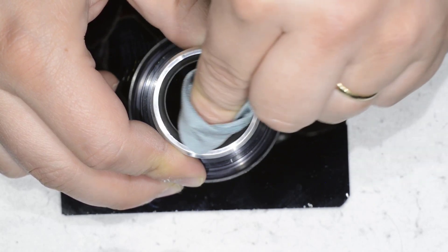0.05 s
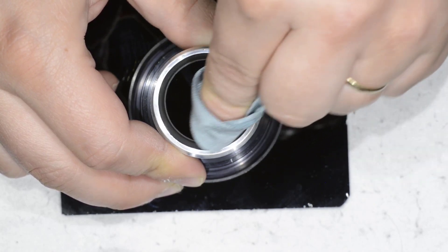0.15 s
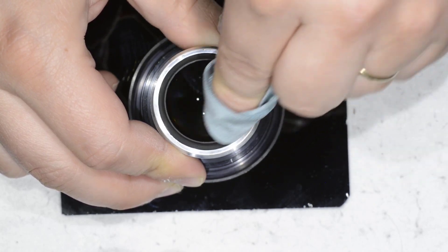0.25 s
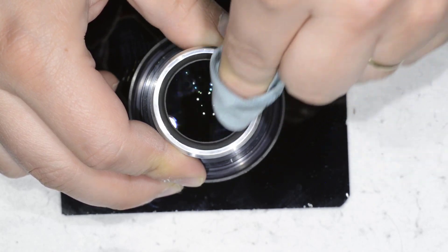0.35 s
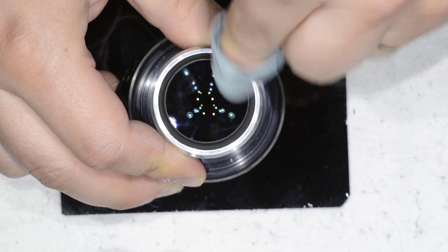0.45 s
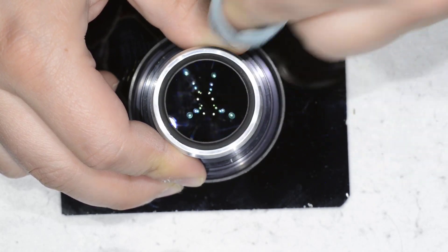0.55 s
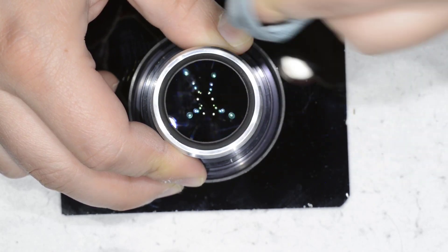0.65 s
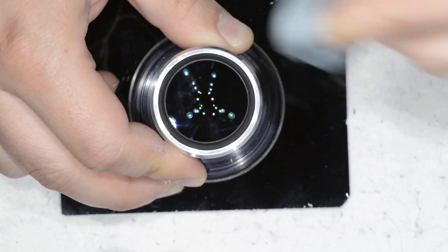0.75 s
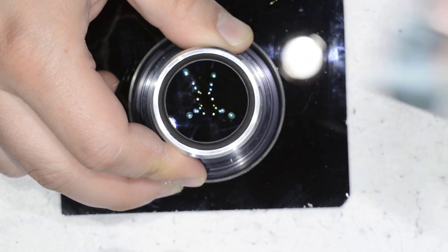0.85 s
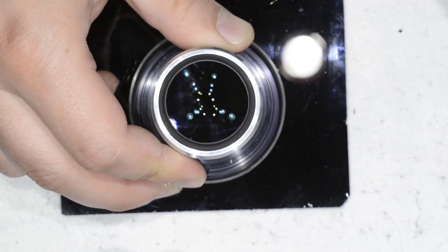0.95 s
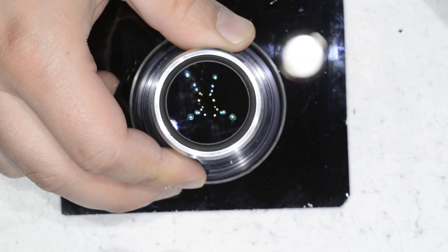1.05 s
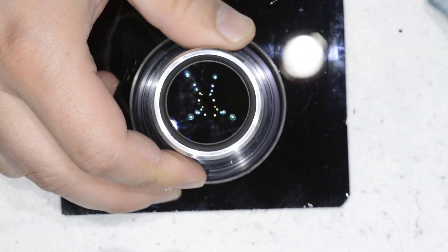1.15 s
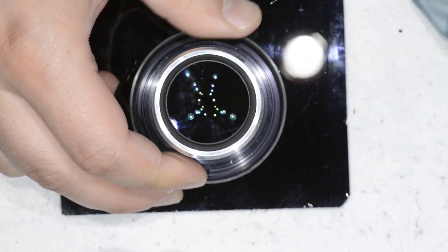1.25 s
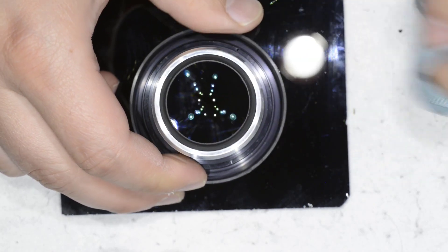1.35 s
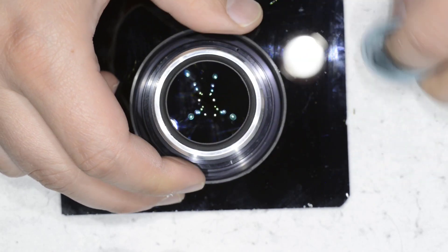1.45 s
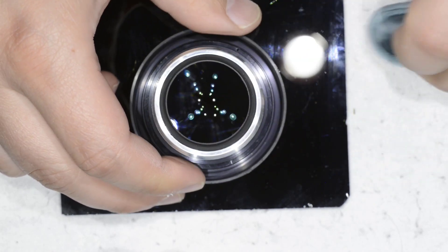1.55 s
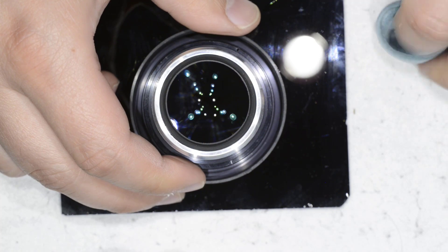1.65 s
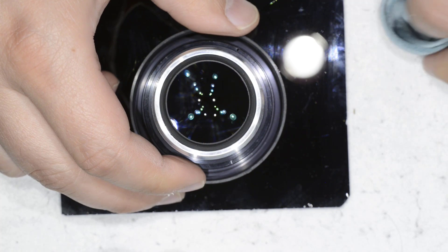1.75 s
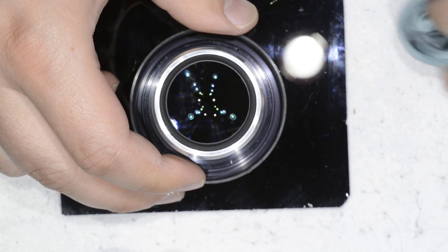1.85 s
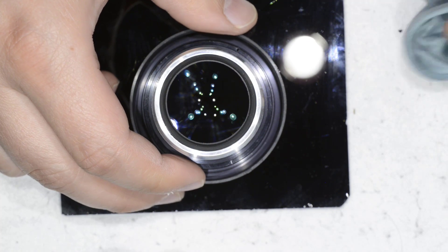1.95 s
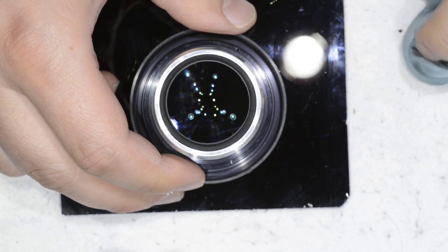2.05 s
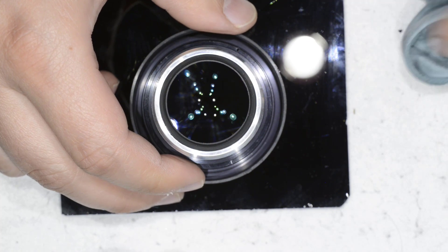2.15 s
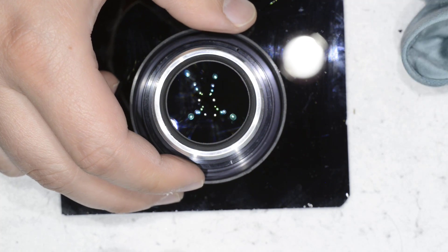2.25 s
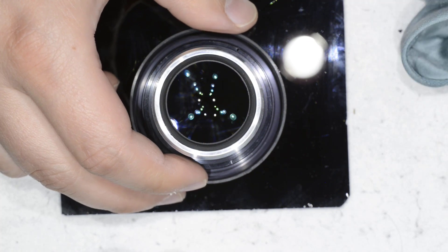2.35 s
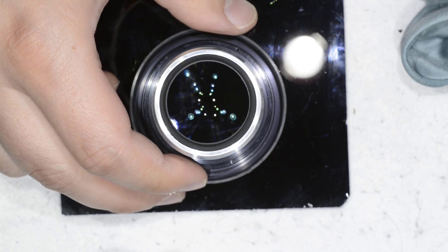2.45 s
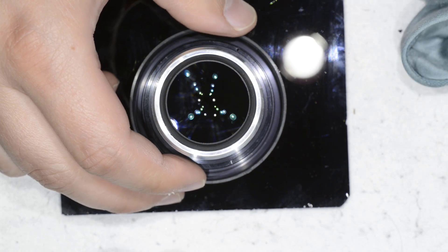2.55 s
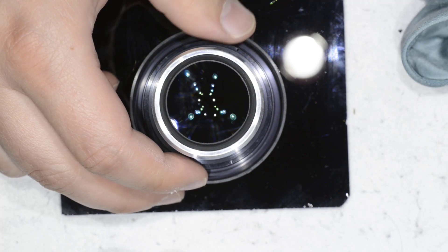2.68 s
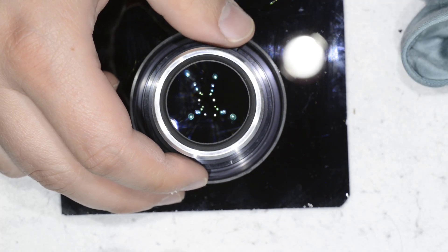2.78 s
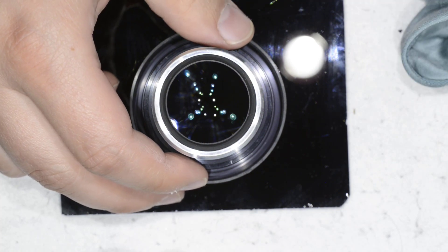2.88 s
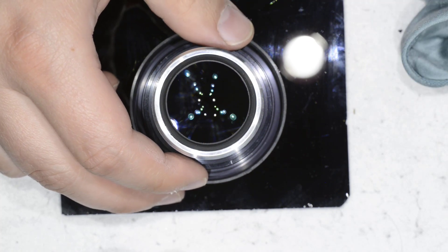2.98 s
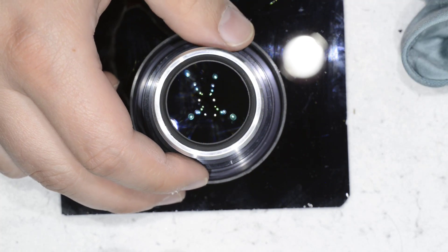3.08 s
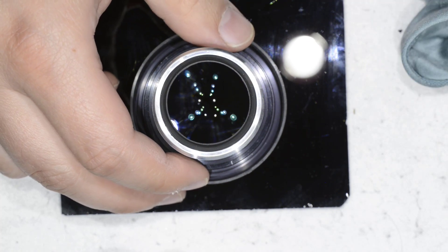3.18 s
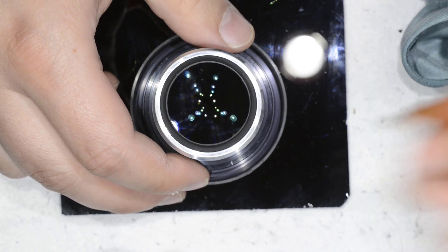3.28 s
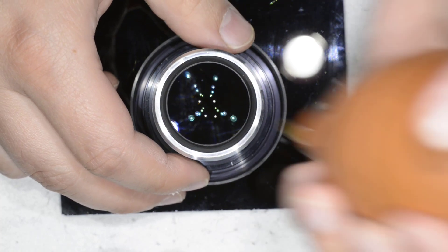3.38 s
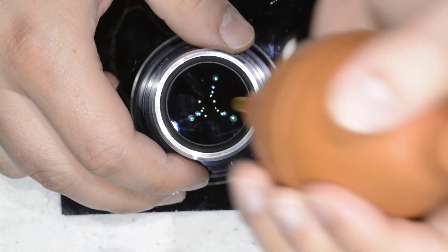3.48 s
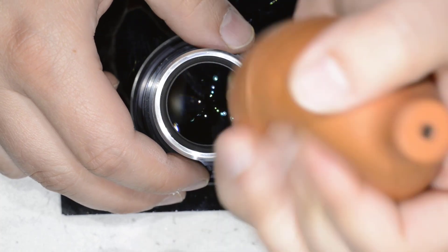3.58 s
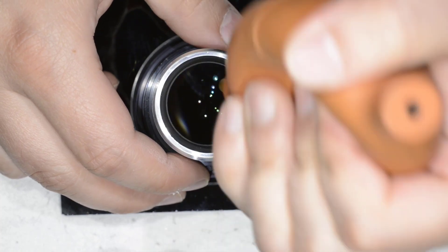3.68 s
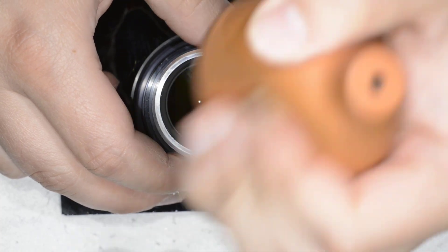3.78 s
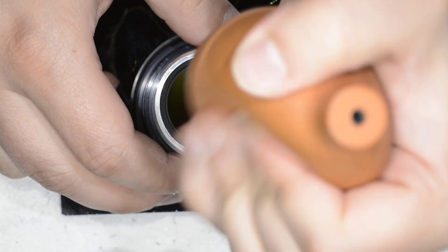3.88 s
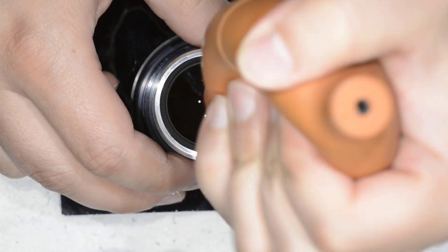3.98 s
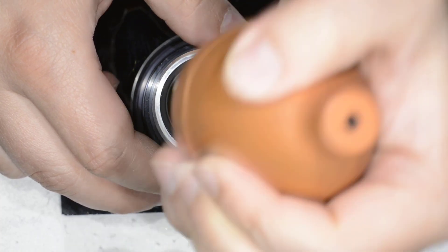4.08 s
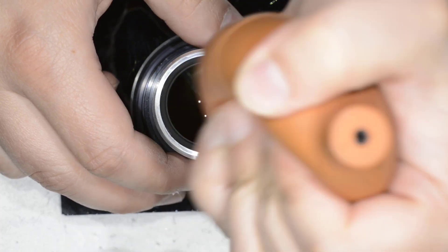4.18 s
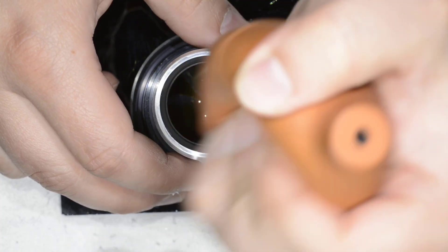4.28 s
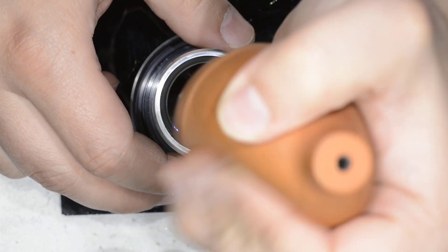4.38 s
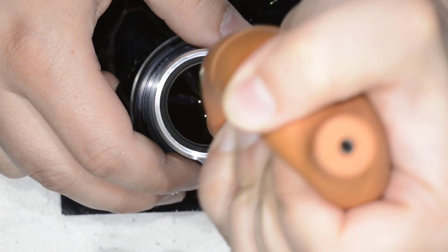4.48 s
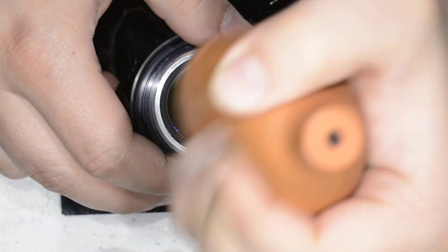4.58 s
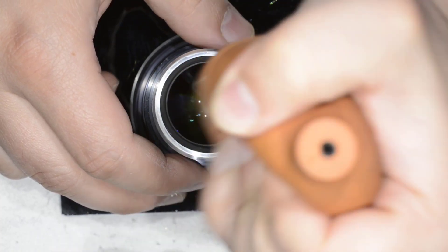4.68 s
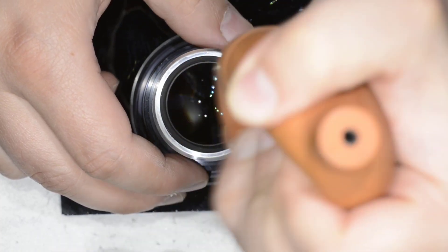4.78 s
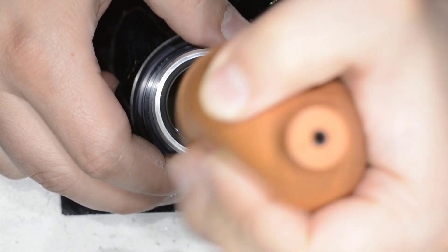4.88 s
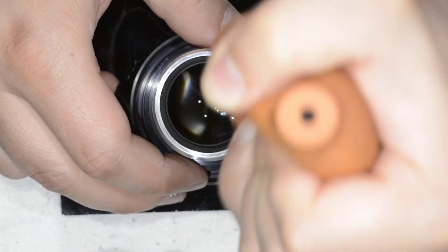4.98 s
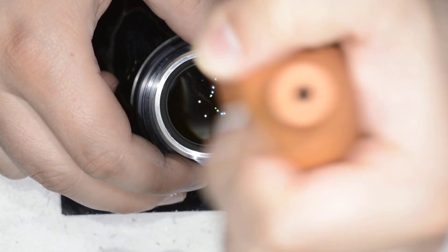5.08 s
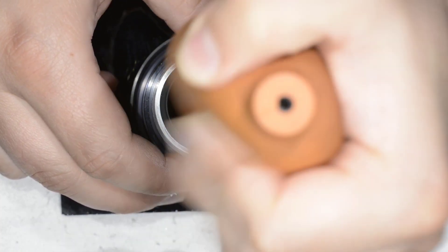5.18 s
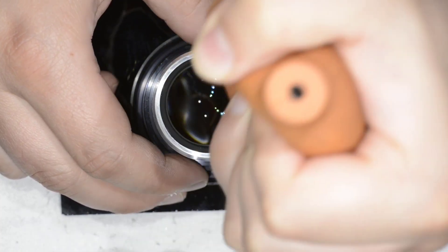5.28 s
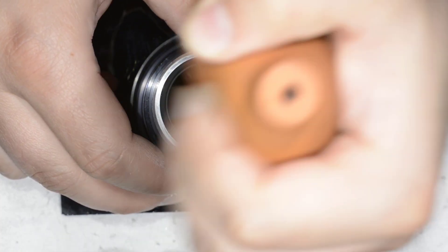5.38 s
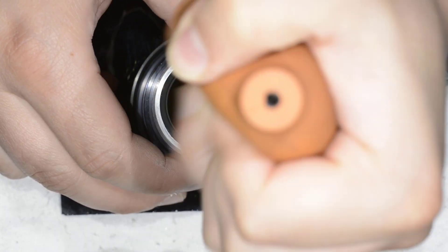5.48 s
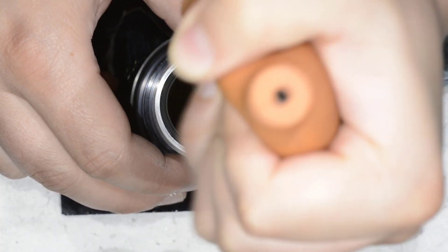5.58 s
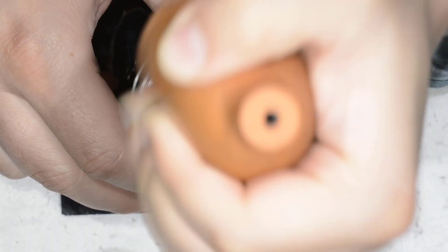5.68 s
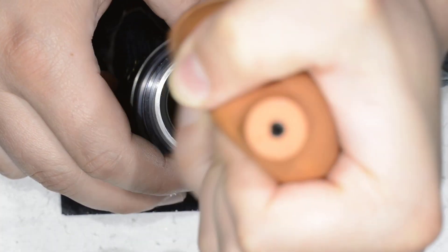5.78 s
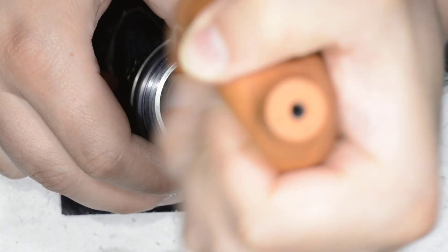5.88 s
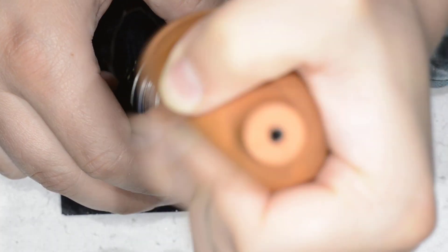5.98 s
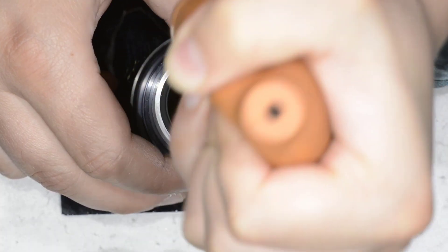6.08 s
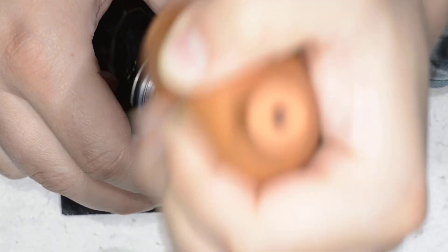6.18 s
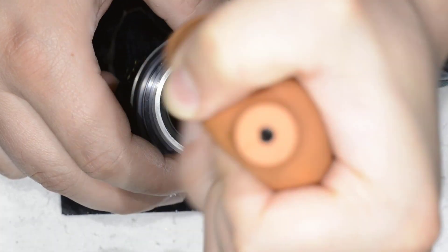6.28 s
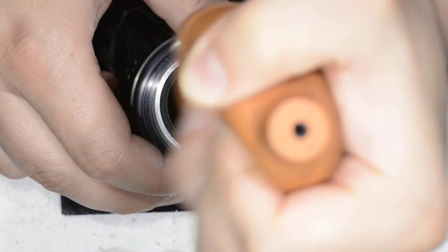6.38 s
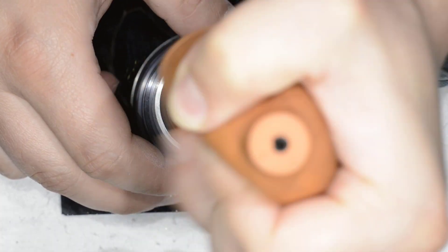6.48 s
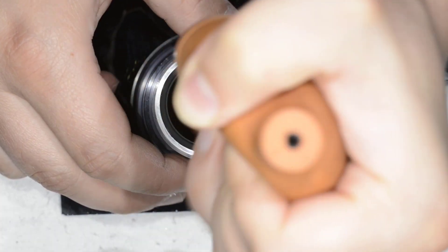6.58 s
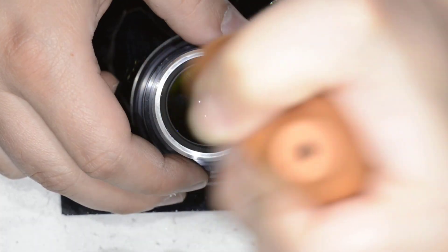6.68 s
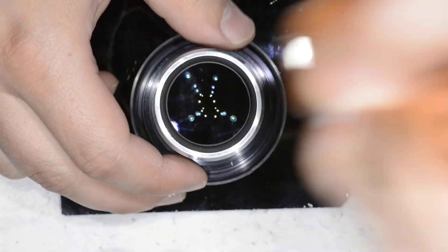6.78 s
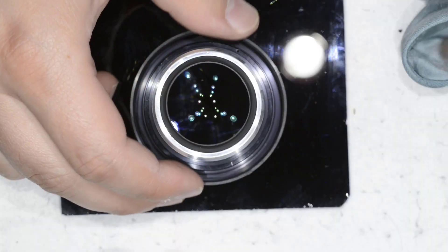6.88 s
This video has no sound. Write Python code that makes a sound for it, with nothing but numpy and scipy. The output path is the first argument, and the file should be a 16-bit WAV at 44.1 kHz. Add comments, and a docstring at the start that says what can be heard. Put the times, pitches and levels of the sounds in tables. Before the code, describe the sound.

Over faint hum and hiss, a few light clicks and rustles, then about thirteen fast airy puffs from a squeezed rubber bulb, each wheezing back in with a snap.

```python
"""A rubber bulb blower, close to a stereo camera microphone, is squeezed about four times a second over a lens.
Each squeeze blows a noisy jet into the lens well; on release, air is sucked back in as a higher hiss.
From the second squeeze on, the inlet valve snaps shut: a pulse through the bulb's resonances.
Before that come ticks of the lifted nozzle and rustles of the hand: short scrapes, knocks and noise.
Behind it lie a small room's decaying noise tail, steady electrical hum and microphone hiss."""
import sys
import numpy as np
from scipy import signal
from scipy.fft import rfft, irfft, next_fast_len
from scipy.io import wavfile
from scipy.ndimage import uniform_filter1d

SR = 44100
rng = np.random.default_rng(int(sys.argv[2]) if len(sys.argv) > 2 else 0)


def unload_audio(sound):
    """Save the sound as a 16-bit wav file, at the path given as the first command line argument."""
    columns = np.transpose(np.atleast_2d(sound))
    # keep every value between -1 and 1, then stretch to whole-number steps
    steps = np.round(np.clip(columns, -1, 1) * 32767)
    wavfile.write(sys.argv[1], SR, steps.astype(np.int16))


def gain_from_db(level_db):
    """Convert decibel levels to linear amplitude factors (20 dB per decade)."""
    decades = np.asarray(level_db, float) / 20
    return 10 ** decades


N = 306362  # length in samples

# Electrical hum near harmonics of the frame rate, then of the mains.
# Each row: frequency in Hz, left and right rms level in dB before the floor gain.
FRAME_HUM_LINES = [(29.97, -55.5, -65), (59.5, -67, -65.5), (91, -64.5, -64), (179, -75.5, -71.5)]
MAINS_HUM_LINES = [(250, -73, -72.5), (305, -75.5, -70.5), (349, -75, -75), (451, -76.5, -75.5),
                   (560, -80, -78.5), (636, -78, -74.5)]
# Colour of the microphone hiss. Each row: frequency in Hz, relative density in dB.
HISS_COLOUR = [(15, -27), (30, -14), (50, -18), (80, -8), (200, -10.5), (450, -13.5), (1000, -16.5),
               (3000, -21), (8000, -24.5), (15900, -26.5)]
# How the two microphone ports hear the hiss, the blower's nozzle and its inlet at the rear.
# Each row: frequency in Hz, likeness of the sides from 0 to 1, lead of the left in radians, left over right in dB.
HISS_EARS_ROWS = [(60, 0.66, 0.19, 15), (200, 0.64, -0.26, -1), (700, 0.52, -.2, -4),
                  (2000, 0.48, 0.24, -2.5), (5000, 0.44, 0.3, 0), (12000, 0.44, 0.24, 2.5)]
NOZZLE_EARS_ROWS = [(700, 1, 0, 0), (2000, 0.97, 0.064, 0.7), (3520, 1, 0.52, 1), (4740, 0.8, 0.6, 3.5),
                    (6170, 0.95, 0.6, 3), (7600, 0.8, 0.93, 2.7), (8900, 0.7, 1.74, 0.5),
                    (11100, 0.55, 1.3, 4.5), (13000, .8, 1.7, 3), (15000, 0.7, 1, 1)]
INLET_EARS_ROWS = [(700, 1, 0.36, .5), (3550, 0.99, 0.35, 1.4), (4850, 0.5, 0.83, 6), (6300, 1, 1.52, 2.5),
                   (7600, 0.52, 1.9, 4.6), (9100, 0.58, 4, 1.5), (10400, 0.65, 2.14, 3.3),
                   (11800, .2, 1.5, 4), (13000, .5, 2, 1.8), (15000, 0.59, 3, 1.8)]
# Hum and hiss sink under the loudest puffs: gain in dB, onset in dB, dB lost per dB above it, memory in seconds.
FLOOR_DB, SINK_FROM_DB, SINK_SLOPE, SINK_MEMORY_S = 6, -21, 2.3, 0.2

# Decay of the room. Each row: frequency in Hz, time to fall 60 dB in seconds.
ROOM_DECAY = [(300, 0.21), (3000, 0.21), (12000, 0.12)]

# Ticks of the plastic nozzle as the blower is lifted.
# Each row: start in seconds, level in dB, dull knock and ring in dB relative to that level.
NOZZLE_TICKS = [(1.202, -46, -6, -12), (2.435, -56, 16, -12), (2.4555, -43, 1, -10),
                (2.4724, -32.5, -14, -2), (2.4914, -46, 1, -2), (2.64, -43, -1, -8), (2.846, -46, 0, -12),
                (2.8706, -38, -4, -13), (2.8964, -37.5, -3, 3.5)]
# Modes of the nozzle. Each row: frequency in Hz, level in dB, time to fall 60 dB in seconds.
NOZZLE_MODES = [(2590, 0.5, 0.039), (2540, -7, 0.068), (3450, -6, 0.02), (4400, -9, 0.06),
                (6420, 2.5, 0.039), (6500, -9, 0.084), (8700, -11, .04)]
# Rustles and clicks of the hand on the rubber.
# Each row: start and end in seconds, top level in dB, rise in seconds, sag by the end in dB.
GRIP_STROKES = [(1.9191, 1.93, -39, .0004, 40), (3.29, 3.385, -54, 0.046, 5),
                (3.446, 3.505, -43.5, 0.015, 7), (3.6058, 3.625, -37.5, 0.00067, 35)]
# Colour of the hand on the rubber. Each row: frequency in Hz, relative density in dB.
RUSTLE_COLOUR = [(1500, -30), (3000, -6), (4000, 0), (6500, -2), (9000, -6), (15000, -16)]

# Inlet valve snapping shut. Each row: time in seconds, drive in dB before the pulse gains and resonances.
VALVE_SNAPS = [(3.911, -19), (4.1752, -14.5), (4.4358, -10.5), (4.694, -7), (4.9515, -5.5), (5.2392, -5.5),
               (5.5084, -5.5), (5.7779, -10), (6.035, -5), (6.2892, -5.5), (6.5264, -5.5), (6.719, -8)]
# Resonances of bulb and valve seat. Each row: frequency in Hz, width in Hz, left and right gain in dB.
BULB_MODES = [(247, 250, 17.5, 9.5), (890, 390, 13.5, 11.5), (2350, 1700, 8.5, -3), (6030, 5400, -2, -25)]
# Bounces of the snap off desk and lens. Each row: delay in seconds, gain in dB before the treble loss.
DESK_BOUNCES = [(.00102, -13.5), (.0022, -15), (.0047, -11.5)]
OPEN_DB = -12.5  # drive of the valve dropping open, before its softening and the resonances

# Refill after each squeeze, until the next snap.
# Each row: top level of the inlet whistle in dB, rise in seconds, sag by the end in dB.
REFILL_STROKES = [(-27, 0.097, 15), (-25.5, 0.074, 8), (-26, 0.083, 6.5), (-27, 0.073, 1),
                  (-27.5, 0.056, 0), (-28, 0.092, 0), (-27.5, 0.082, 0), (-26.5, 0.084, 2), (-26, 0.085, 9),
                  (-27.5, 0.053, 0), (-25.5, 0.069, 6), (-27.5, 0.042, 7), (-28, 0.06, -0.5)]
# Colours of the inlet whistle and of the body of the refill. Each row: frequency in Hz, relative density in dB.
WHISTLE_COLOUR = [(4710, -31), (8000, -6.5), (8570, -11), (9130, 2.5), (9690, -0.5), (10500, 1.5),
                  (11400, -7.5), (12400, -7), (13200, -15), (14600, -11), (15100, -5), (15900, -55)]
BODY_COLOUR = [(290, -54), (500, -27), (654, -30), (1030, -13.5), (1150, -21.5), (1480, -15.5),
               (1710, -18.5), (2340, -11.5), (2570, -13.5), (2930, -9.5), (3790, -11.5), (4800, -5.5),
               (5300, 0), (5900, -0.5), (7290, -3), (8200, -4.5), (10700, -29), (18000, -120)]
BODY_DB, BODY_FOLLOWS = 0.82, 0.65  # body relative to whistle at full flow; exponent on the flow
INLET_FALL_S, INLET_EDGE = 0.019, 1.04  # fall in seconds; steepness of the edges
INLET_EARLY_S, INLET_LATE_S = 0.0093, 0.0045  # overlap with the squeeze before and the snap after

# The squeezes. Each row: start and end in seconds, top level of the jet in dB, rise in seconds, sag by the end in dB.
SQUEEZE_STROKES = [(3.629, 3.791, -21, 0.074, -0.5), (3.915, 4.075, -19.5, 0.07, 3),
                   (4.174, 4.335, -19, 0.071, 6.5), (4.435, 4.597, -23, 0.046, 2.5),
                   (4.693, 4.8468, -17, 0.051, 3), (4.954, 5.124, -17, 0.039, 2),
                   (5.24, 5.3935, -17.5, 0.057, 4), (5.506, 5.6647, -16.5, 0.048, 8.5),
                   (5.774, 5.93, -18, 0.045, 5.5), (6.031, 6.19, -20.5, 0.034, 0.5),
                   (6.285, 6.435, -23, 0.028, 2.5), (6.516, 6.664, -23, 0.062, 6),
                   (6.72, 6.837, -16, 0.093, 9)]
# How each squeeze is aimed, before the flow corrections.
# Each row: lens well tone, splash on the glass, nozzle overtone and shear hiss, all in dB relative to the jet.
SQUEEZE_AIM = [(-9.5, -4.5, -9, -9.5), (-12.5, -5.5, -5.5, -6), (-10.5, -3.5, -5, -5), (-6, -4.5, -7, -1.5),
               (-13.5, -6.5, -5.5, -4.5), (-30, -6.5, -5, -5.5), (-20, -6, -3, -2), (-15.5, -7.5, -2.5, -5),
               (-9.5, -8, -3.5, -5.5), (-8.5, -7, -2, -5), (-4.5, -4, -6, -5.5), (-6, -3.5, -5.5, -4.5),
               (-14.5, -1.5, -6, -9.5)]
# Colours of the jet, lens well tone, low rush, splash, overtone and shear hiss.
# Each row: frequency in Hz, relative density in dB.
JET_COLOUR = [(2500, -38), (4000, -9), (4400, -8), (4850, -7), (5250, 0), (5650, -1.5), (6030, 1.5),
              (6400, -3), (6900, -10.5), (9000, -29)]
WELL_COLOUR = [(800, -24.5), (1100, -11), (1250, -6), (1400, 3.5), (1560, -5), (1900, -6.5), (2400, -26.5),
               (2750, -6.5), (2980, -1), (3250, -12.5), (4200, -30)]
BOOM_COLOUR = [(250, -34), (500, -12.5), (800, -3.5), (1050, -0.5), (1500, -3.5), (2200, -18), (3500, -45)]
SPLASH_COLOUR = [(900, -44), (1500, -25), (1760, -4), (1960, -5.5), (2250, -1.5), (2600, -2), (3000, -3),
                 (3500, -1), (4000, -5), (5200, -24)]
OVERTONE_COLOUR = [(5500, -49), (6800, -7.5), (7250, 0.5), (7500, -3), (7900, 1), (8300, -4.5), (8700, -5),
                   (10500, -25)]
SHEAR_COLOUR = [(5120, -33), (8700, -5), (9640, -3), (10600, 0), (12800, -3), (14100, -2.5), (14900, -7),
                (15900, -11)]
JET_FALL_S, JET_EDGE = 0.073, 1.41  # the hand runs out of travel; steepness of the edges
WELL_FOLLOWS = 0.53  # exponent on the stroke: the well tone grows more slowly than the jet
BOOM_DB = -20  # low rush relative to the jet at the top of a stroke

TOP_HZ = 15680  # upper band limit of the camera


def unit(x):
    """Scale to rms 1."""
    return x / np.sqrt(np.mean(x ** 2) + 1e-20)


def along(points, hz):
    """Read a curve of (Hz, value) points on a log frequency axis."""
    f, v = np.transpose(points)
    return np.interp(np.log(hz + 1), np.log(f + 1), v)


def wobble(rate):
    """A random curve with rate knots a second, joined by straight lines."""
    knots = rng.standard_normal(N // 40)
    return np.interp(np.arange(N) * rate / SR, np.arange(len(knots)), knots)


def filtered(x, response):
    """Shape x by a complex response of frequency."""
    m = next_fast_len(N + 8192)
    hz = np.fft.rfftfreq(m, 1 / SR)
    return irfft(rfft(x, m) * response(hz), m)[..., :N]


def ports(ears, hz):
    """Level and phase of a source at the left and right microphone ports."""
    f, _, lead, pan_db = np.transpose(ears)
    half = np.array([[.5], [-.5]])
    level = gain_from_db(half * along(np.c_[f, pan_db], hz))
    phase = half * along(np.c_[f, lead], hz)
    return level * np.exp(1j * phase)


def rush(colour, ears, patchy_db, rough_db):
    """Turbulent stereo noise, mid rms 1: patchy in time and frequency, with gusty eddies in its level."""
    z = signal.stft(rng.standard_normal((2, N)), nperseg=256)[2]
    patches = uniform_filter1d(rng.standard_normal(z.shape[1:]), size=3, axis=0)
    patches = uniform_filter1d(patches, size=10, axis=1)
    pair = signal.istft(z * gain_from_db(patchy_db * unit(patches)), nperseg=256)[1][:, :N]
    pair = pair * gain_from_db(rough_db * (wobble(700) + wobble(90)))

    def shared_and_opposed(hz):
        likeness = np.clip(along(np.array(ears)[:, :2], hz), -1, 1)
        turn = np.arccos(likeness) / 2
        return gain_from_db(along(colour, hz)) * [np.cos(turn), np.sin(turn)]

    shared, opposed = filtered(pair, shared_and_opposed)
    sides = np.array([shared + opposed, shared - opposed])
    sides = filtered(sides, lambda hz: ports(ears, hz))
    return sides / np.std(sides.mean(axis=0))


def strokes(rows, fall_s, edge):
    """Rise, sagging hold and fall of each stroke: the gain, its share of the top, and the stroke's number."""
    t = np.arange(N) / SR
    starts = np.transpose(rows)[0]
    which = np.clip(np.searchsorted(starts, t) - 1, 0, None)
    start, end, top_db, rise, sag_db = np.array(rows)[which].T

    def ramp(u):
        return np.sin(np.pi / 2 * np.clip(u, 0, 1)) ** edge

    held = np.clip((t - start - rise) / (end - start - rise), 0, 1)
    share = ramp((t - start) / rise) * ramp((end - t) / fall_s) * gain_from_db(-sag_db * held)
    return gain_from_db(top_db) * share, share, which


def hum(lines, crest_s, lead):
    """Nearly steady tones that crest together at crest_s; the right side is lead radians ahead."""
    t = np.arange(N) / SR - crest_s
    out = np.zeros((2, N))
    for hz, left_db, right_db in lines:
        drift_db = .8 * wobble(5)
        peak = gain_from_db(np.array([[left_db], [right_db]]) + drift_db) * np.sqrt(2)
        out += peak * np.cos(2 * np.pi * hz * t + np.array([[0], [lead]]))
    return out


def floor(near):
    """Hum over microphone hiss; both sink while the smoothed power of the near sounds is high."""
    hiss = gain_from_db(-55.0) * rush(HISS_COLOUR, HISS_EARS_ROWS, patchy_db=.5, rough_db=0.2)
    tones = hum(FRAME_HUM_LINES, .0283, .65) + hum(MAINS_HUM_LINES, .004, .3)
    keep = np.exp(-1 / (SINK_MEMORY_S * SR))
    power = signal.lfilter([1 - keep], [1, -keep], near.mean(axis=0) ** 2)
    loud_db = 10 * np.log10(power + 1e-12)
    sink_db = SINK_SLOPE * np.clip(loud_db - SINK_FROM_DB, 0, None)
    return gain_from_db(FLOOR_DB - sink_db) * (tones + hiss)


def room(x):
    """The room's answer is a noise tail in which each frequency dies at its own speed."""
    hz, t, z = signal.stft(rng.standard_normal((2, SR // 3)), SR, nperseg=256)
    decay = gain_from_db(-60 * t / along(ROOM_DECAY, hz)[:, None])
    tail = signal.istft(z * decay, SR, nperseg=256)[1]
    tail = tail / np.linalg.norm(tail[0])
    delayed = np.pad(x, (300, 0))[None]  # samples before the tail begins
    return signal.fftconvolve(delayed, tail, axes=1)[:, :N]


def ticks():
    """Each tick is a short scrape and a dull knock, and rings the decaying modes of the plastic nozzle."""
    out = np.zeros(N)
    t = np.arange(SR // 8) / SR
    onset = 1 - np.exp(-t / 0.00062)
    for s, db, knock_db, ring_db in NOZZLE_TICKS:
        ring = np.zeros(len(t))
        for hz, mode_db, t60 in NOZZLE_MODES:
            spread_db = 2 * rng.standard_normal()  # each tick strikes the modes a little differently
            ring += gain_from_db(mode_db + spread_db - 60 * t / t60) * np.sin(2 * np.pi * hz * t)
        scrape_noise, phase_noise = rng.standard_normal((2, len(t)))
        scrape = 1.12 * gain_from_db(-60 * t / 0.089) * uniform_filter1d(scrape_noise, size=3)
        unsteady = 0.266 * np.cumsum(phase_noise)  # a wandering phase blurs the knock's pitch
        knock = gain_from_db(knock_db - 60 * t / 0.072) * np.sin(2 * np.pi * 800 * t + unsteady)
        tick = (gain_from_db(ring_db) * ring + scrape + knock) * onset
        out[round(s * SR):][:len(t)] += gain_from_db(db) * tick
    return filtered(out, lambda hz: ports(INLET_EARS_ROWS, hz))


def grip():
    """Fingers slide onto the rubber: friction noise in short strokes."""
    rustle = rush(RUSTLE_COLOUR, INLET_EARS_ROWS, patchy_db=1.5, rough_db=1.5)
    gain, _, _ = strokes(GRIP_STROKES, fall_s=0.015, edge=1.5)
    return gain * rustle


def valve():
    """A closing valve pushes a little air, then stops with a sharp suction pulse; an opening one is soft."""
    sharp, soft = np.zeros(N), np.zeros(N)
    for s, db in VALVE_SNAPS:
        sharp[round(s * SR) - 1] = -gain_from_db(db + 5.5)
        soft[round((s - .0006) * SR)] = gain_from_db(db + 0.5)
    for stroke in SQUEEZE_STROKES:
        soft[round(stroke[1] * SR) - 12] = gain_from_db(OPEN_DB)
    blows = sharp + filtered(soft, lambda f: 1 / (1 + 1j * f / 900) ** 2)

    def bulb_and_desk(f):
        bulb = 0
        for centre, width, left_db, right_db in BULB_MODES:
            mode = 1j * f * width / (centre ** 2 - f ** 2 + 1j * f * width)
            bulb = bulb + gain_from_db([[left_db], [right_db]]) * mode
        bounces = sum(gain_from_db(db) * np.exp(-2j * np.pi * f * s) for s, db in DESK_BOUNCES)
        echo = 1 + bounces / (1 + 1j * f / 4000)
        late = np.exp(-2j * np.pi * f * 3e-5 * np.array([[0], [1]]))  # the right port hears it later
        return bulb * echo * late / (1 + 1j * f / 8000)

    return filtered(blows, bulb_and_desk)


def refill():
    """Air drawn through the rear valve: a smoother, higher hiss, nearer the left side."""
    shuts = [s for s, db in VALVE_SNAPS] + [N / SR + INLET_FALL_S]
    rows = []
    for stroke, shut, row in zip(SQUEEZE_STROKES, shuts, REFILL_STROKES):
        rows.append((stroke[1] - INLET_EARLY_S, shut + INLET_LATE_S, *row))
    flow, share, _ = strokes(rows, INLET_FALL_S, INLET_EDGE)
    whistle = rush(WHISTLE_COLOUR, INLET_EARS_ROWS, patchy_db=1.8, rough_db=-0.9)
    body = gain_from_db(BODY_DB) * rush(BODY_COLOUR, INLET_EARS_ROWS, patchy_db=1.8, rough_db=0.9)
    body = np.clip(share, .03, None) ** (BODY_FOLLOWS - 1) * body
    return flow * (whistle + body)


def squeeze():
    """The jet sings in the nozzle, booms in the lens well, splashes on the glass and tears into fine hiss."""
    jet, share, which = strokes(SQUEEZE_STROKES, JET_FALL_S, JET_EDGE)
    well_db, splash_db, overtone_db, shear_db = np.array(SQUEEZE_AIM)[which].T
    force = np.clip(jet / gain_from_db(-24.5), .03, None)  # weak flow sounds duller in the nozzle
    core = rush(JET_COLOUR, NOZZLE_EARS_ROWS, patchy_db=2.0, rough_db=-0.7)
    tone = gain_from_db(well_db) * rush(WELL_COLOUR, NOZZLE_EARS_ROWS, patchy_db=2.0, rough_db=-0.5)
    boom = gain_from_db(BOOM_DB) * rush(BOOM_COLOUR, NOZZLE_EARS_ROWS, patchy_db=-1.0, rough_db=2.5)
    well = np.clip(share, .03, None) ** (WELL_FOLLOWS - 1) * (tone + boom)
    splash = rush(SPLASH_COLOUR, NOZZLE_EARS_ROWS, patchy_db=3.0, rough_db=0.94)
    splash = gain_from_db(splash_db) * force ** -.3 * splash
    overtone = rush(OVERTONE_COLOUR, NOZZLE_EARS_ROWS, patchy_db=-1.5, rough_db=0.9)
    overtone = gain_from_db(overtone_db) * force ** 0.042 * overtone
    shear = rush(SHEAR_COLOUR, NOZZLE_EARS_ROWS, patchy_db=3.0, rough_db=-0.1)
    shear = gain_from_db(shear_db) * force ** 0.029 * shear
    return jet * (core + well + splash + overtone + shear)


def scene():
    """Blower, hand and ticks close to the microphone in a small room, over the floor."""
    near = squeeze() + refill() + valve() + grip() + ticks()
    return near + gain_from_db(-12) * room(near.mean(axis=0)) + floor(near)


def low_pass(x):
    """Removes everything above the highest recorded frequency."""
    return signal.sosfilt(signal.butter(12, 16010, fs=SR, output="sos"), x)


def record(dry):
    """The camera rounds off the highest peaks and limits the band."""
    rounded = dry / (1 + np.abs(dry / .92) ** 5) ** (1 / 5)
    mix = filtered(rounded, lambda hz: hz < TOP_HZ)
    return low_pass(mix)


dry = scene()
out = record(dry)
unload_audio(out)
```